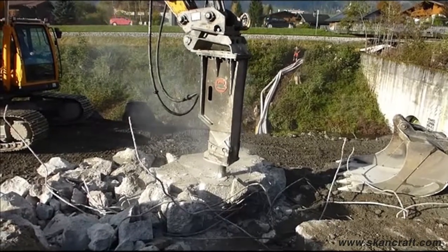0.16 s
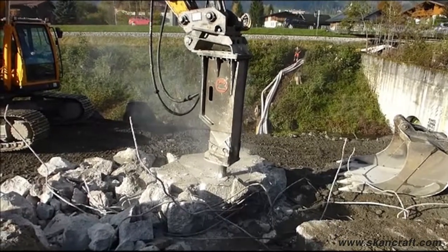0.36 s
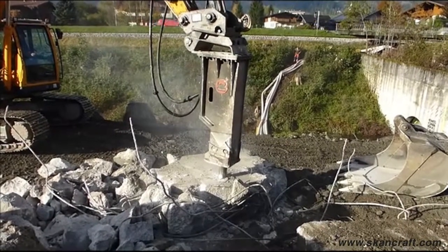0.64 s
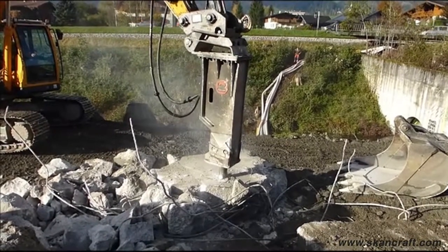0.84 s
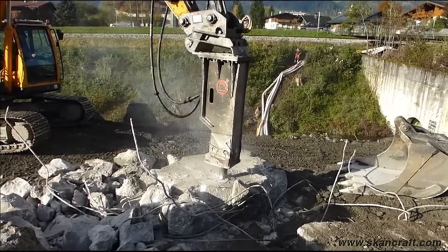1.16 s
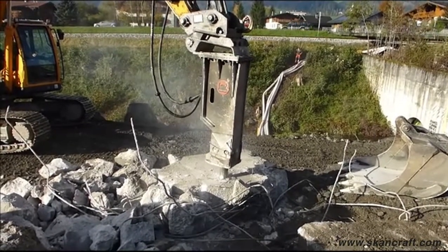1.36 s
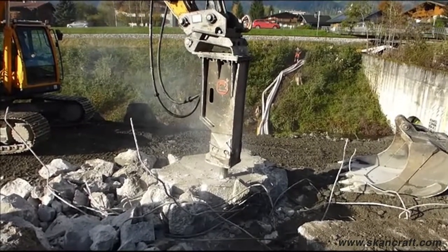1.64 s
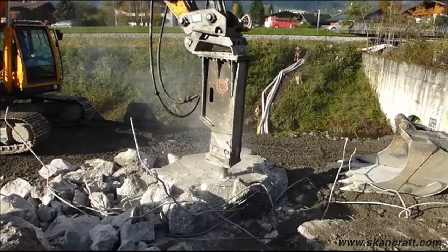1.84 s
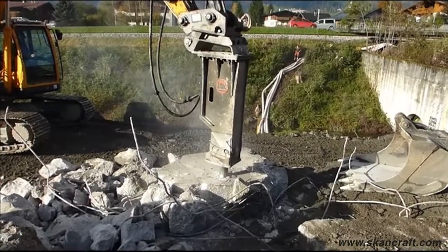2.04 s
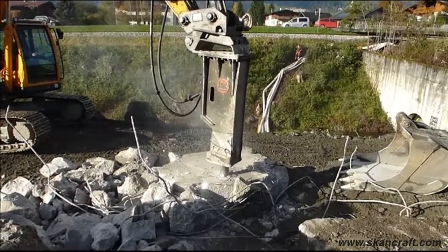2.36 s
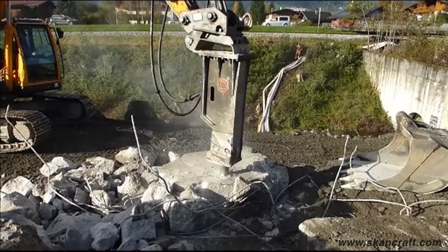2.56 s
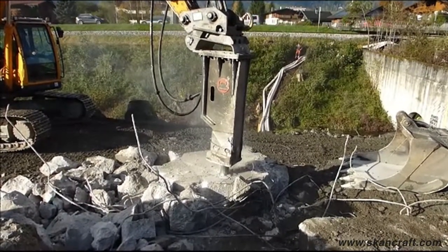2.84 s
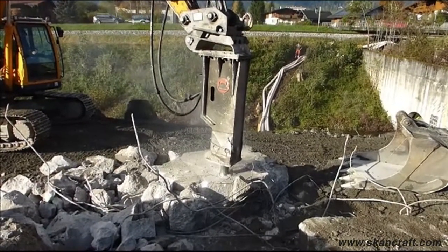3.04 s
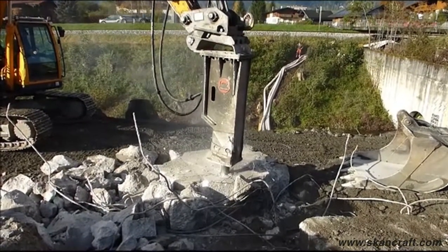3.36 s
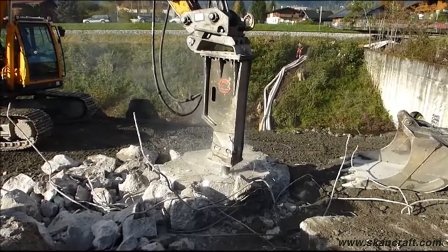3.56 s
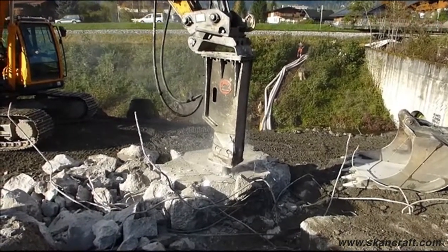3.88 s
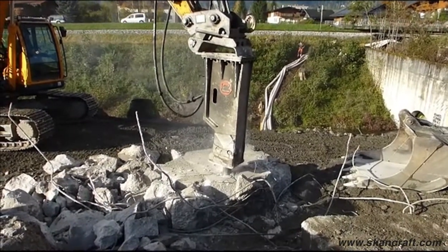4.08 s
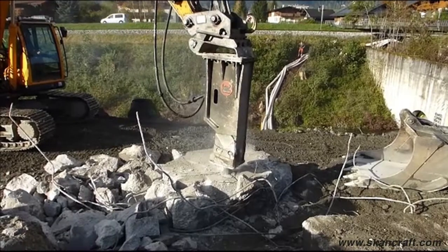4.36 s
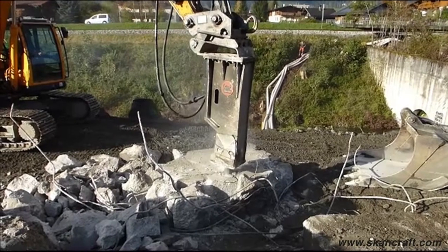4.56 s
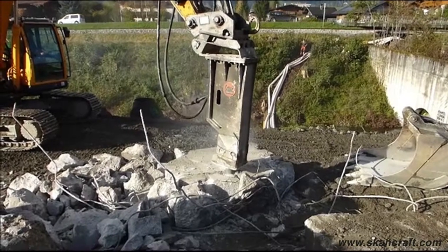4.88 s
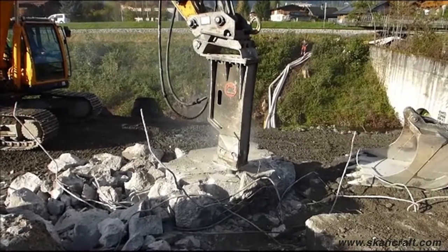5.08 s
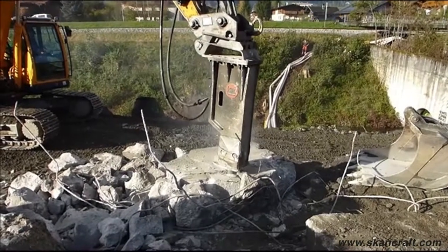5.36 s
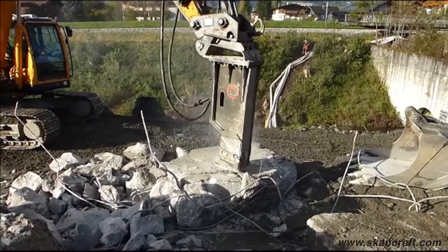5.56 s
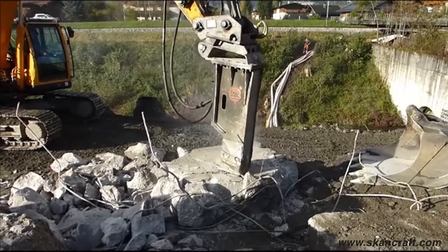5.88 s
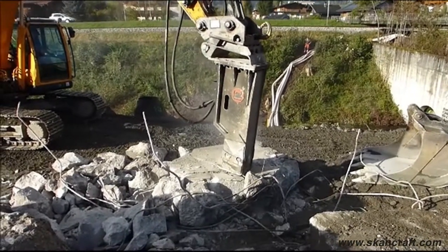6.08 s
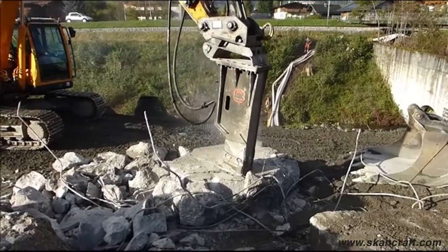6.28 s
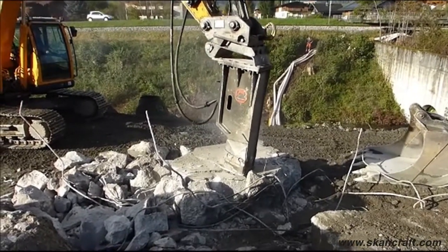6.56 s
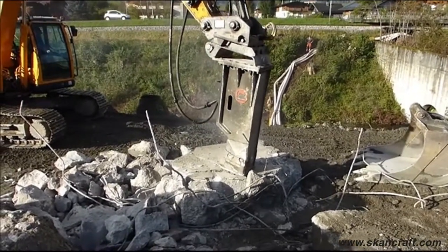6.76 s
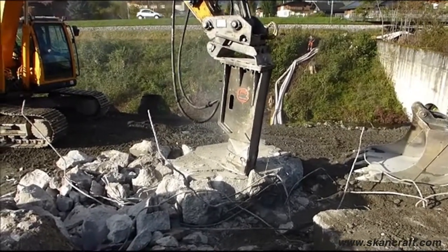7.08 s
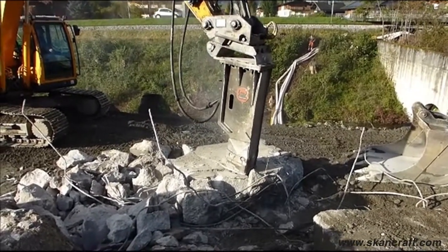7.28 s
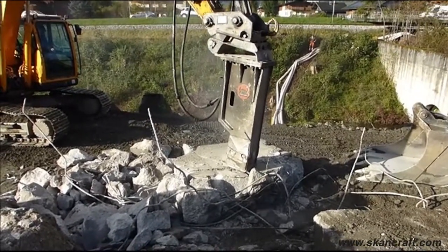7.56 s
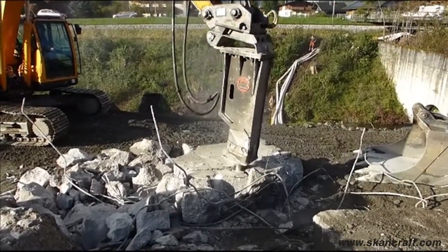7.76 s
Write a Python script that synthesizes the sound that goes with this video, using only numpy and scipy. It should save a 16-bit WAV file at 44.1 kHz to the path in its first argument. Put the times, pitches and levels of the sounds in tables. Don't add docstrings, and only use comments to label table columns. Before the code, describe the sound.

A hydraulic breaker is already pounding concrete at 0 s, in even blows around eight per second, over a low diesel rumble, fan noise and wavering pump tones. Just before each blow a valve spits a short whistling hiss; then steel cracks on stone, the slab thuds briefly and housing, chisel and loose panels ring and rattle, with a small recoil knock and site echo. From about 3 to 4.5 s the chisel bites deeper and the ringing grows fuller and changes colour. From 4.6 s the slab gives way: blows vary more and slow to about five or six per second, with chips clinking. The last full blow comes near 6.7 s; at 6.9 s an empty one merely shudders the housing. Afterwards the quieter engine runs on, a faint high belt whistle appears from 7.1 s, and stones tick and knock at 7.6-7.8 s. Mono, outdoors, slight hiss and softened peaks.

```python
import sys
import numpy as np
from scipy import signal
from scipy.io import wavfile
from scipy.ndimage import uniform_filter1d

SR = 44100
rng = np.random.default_rng(int(sys.argv[2]) if len(sys.argv) > 2 else 0)


def rack_gain(trim_db):
    fader = np.asarray(trim_db, float)
    return 10 ** (fader / 20)


def store_pcm(level_fs):
    pcm = np.round(np.clip(level_fs, -1, 1) * 32767).astype(np.int16)
    wavfile.write(sys.argv[1], SR, np.atleast_2d(pcm).T)


N = 349713
LENGTH = 11000


STAGES_S = [1.0, 2.9, 4.3, 6.1]


def by_stage(times, values):
    return np.interp(times, STAGES_S, values)


def at_hz(points, hz, axis=1):
    points = np.array(points)
    return np.interp(np.log(hz), np.log(points[:, 0]), points[:, axis])


def dying(t60, rise_s):
    t = np.arange(LENGTH) / SR
    swell = 1 - np.exp(-(t / rise_s) ** 2)
    close = np.cos(np.pi / 2 * (t / t[-1]) ** 4)
    return swell * rack_gain(-60 * t / t60) * close


def sine(hz, turn):
    return np.sin(2 * np.pi * hz * np.arange(LENGTH) / SR + turn)


def resonate(x, hz, width_hz):
    r = np.exp(-np.pi * width_hz / SR)
    feedback = [1, -2 * r * np.cos(2 * np.pi * hz / SR), r * r]
    return signal.lfilter([1, 0, -1], feedback, x) * np.sqrt((1 - r * r) / 2)


def bands(whites):
    edges = 16000 / 2 ** np.arange(9, -.1, -.5)
    for k, (low, high) in enumerate(zip(edges, edges[1:])):
        sos = signal.butter(2, [low, high], "band", fs=SR, output="sos")
        noise = signal.sosfilt(sos, whites[k % 2])
        yield np.sqrt(low * high), noise * np.sqrt(SR / 2 / (high - low))


# time_s, likeness (0-1)
LIKENESS = [(0, .95), (2, .93), (3, .8), (4.6, .8), (5.4, .4), (7, .35)]


def repeating(times, size):
    rows = rng.standard_normal((len(times), size))
    alike = np.interp(times, *np.transpose(LIKENESS))
    for k in range(1, len(times)):
        rows[k] = alike[k] * rows[k - 1] + np.sqrt(1 - alike[k] ** 2) * rows[k]
    return rows


def lay_out(rows, times):
    out = np.zeros(N + 2 * LENGTH)
    for row, s in zip(rows, times):
        at = LENGTH + round(s * SR)
        out[at:at + LENGTH] += row
    return out[LENGTH:LENGTH + N]


# pitch_hz, level_db (per Hz)
ENGINE = [(25, -2), (53, -10), (109, -2), (158, 0), (290, -9), (515, -4.5), (6900, -35), (15000, -53.5)]
# time_s, noise_db, brightness_db (per octave)
LOAD = [(0, -39.5, -0.5), (2, -38.5, -0.5), (4, -35.5, -0.5), (5.5, -39, 0), (6.9, -53.5, 2.5),
        (7.6, -49, 1.5), (7.75, -45, 0.2)]
# pitch_hz, level_db (rms), width_hz
TONES = [(88.4, -55.5, 6.3), (148, -59, 5), (177.8, -52.5, 8.6), (205, -70, 6), (247.9, -54, 0.92),
         (521.8, -52.5, 13.6), (680, -77.5, 80)]


def engine():
    t = np.arange(N) / SR
    load_s, *columns = np.transpose(LOAD)
    noise_db, tilt_db = [np.interp(t, load_s, column) for column in columns]

    noise = 0
    for hz, band in bands(rng.standard_normal((2, N))):
        flicker_db = np.interp(t, np.arange(200) / 18, rng.standard_normal(200))
        band_db = at_hz(ENGINE, hz) + flicker_db + tilt_db * np.log2(hz / 300)
        noise = noise + rack_gain(band_db) * np.sqrt(hz) * band
    noise *= (1 + .2 * np.sin(2 * np.pi * 43.05 * t)) / np.std(noise)

    white = rng.standard_normal(N)
    tones = sum(rack_gain(db) * resonate(white, hz, width_hz) for hz, db, width_hz in TONES)
    tone_db = -0.5 - 0.38 * (noise_db - noise_db.mean())

    belt_db = np.interp(t, [7.05, 7.2, 7.58, 7.73], [-95, -75, -75, -80])
    belt_db += 3.5 * np.interp(t, np.arange(200) / 20, rng.standard_normal(200))
    belt = rack_gain(belt_db) * resonate(white, 10650, 90)
    return rack_gain(noise_db) * noise + rack_gain(tone_db) * tones + belt


# time_s, clinks_per_s, level_db
CHIPS = [(0, 100, -82), (3.5, 200, -92), (5, 300, -62), (6.7, 300, -68), (7.05, 20, -68), (7.93, 10, -76)]


def chips():
    s, per_s, db = np.transpose(CHIPS)
    t = np.arange(N) / SR
    born = rng.random(N) < np.interp(t, s, per_s) / SR
    spread_db = 3.6 * rng.exponential(1, N).clip(0, 3)
    sizes = born * rack_gain(np.interp(t, s, db) + spread_db) + 1e-18
    pitches = np.geomspace(2600, 14500, 16)
    dealt = rng.integers(0, 16, N)
    return sum(6.2 * resonate(sizes * (dealt == k), hz, 130) for k, hz in enumerate(pitches))


# start_s, peak_db, pitch_hz
STONES = [
    (7.609, -51, 13500),
    (7.627, -57, 4200),
    (7.756, -45, 5000),
    (7.757, -59, 13000),
    (7.768, -55, 10500),
    (7.822, -52, 11000),
]


def stones():
    ticks = rng.standard_normal((len(STONES), LENGTH)) * dying(0.014, 0.00033)
    rows = [rack_gain(db) * resonate(tick, hz, .5 * hz) for tick, (s, db, hz) in zip(ticks, STONES)]
    return lay_out(rows, np.array(STONES)[:, 0])


# blow_number, time_s
PACE = [(-1, -.1111), (8, .9831), (16, 1.9612), (23, 2.8049), (31, 3.7719), (37, 4.5064)]
# time_s, thud_db, housing_db, steel_db
SEAT = [(0, -2, -0.5, 1), (.9, -.5, -3, 0.4), (1.8, 0.5, -0.5, 0), (2.5, -2, 0.5, 0.3), (2.95, -2, -1, -1),
        (3.5, -.3, 2.2, -3), (3.95, -2.8, -0.5, -2), (4.5, 1, -2, -3.5)]
# start_s, thud_db, housing_db, steel_db
SLOWING = [(4.632, 1.5, 0, -3), (4.7597, 4, 1.5, -2), (4.8903, 0, 0, -1.5), (5.0288, 0.5, 1.5, -1),
           (5.1768, 1, 1, -1.5), (5.337, 1, 1.5, -0.5), (5.4984, 1, -1.5, 0), (5.6774, 0, -2, 0.5),
           (5.8607, -3.5, -1, -1), (6.0395, -6.5, 1, -2), (6.2304, 0.5, -2, -1), (6.422, 1.5, -3.5, -1.5),
           (6.5901, 1.5, -0.5, -1), (6.7359, -1, -1.5, -1), (6.926, -11, -21, -27.5)]


def blow_table():
    number, mark_s = np.transpose(PACE)
    times = np.interp(np.arange(number[0], number[-1] + 1), number, mark_s)
    s, *parts = np.transpose(SEAT)
    steady = np.transpose([times] + [np.interp(times, s, part) for part in parts])
    return np.vstack([steady, SLOWING]).T


def part_db(blows, hz):
    times, thud_db, housing_db, steel_db = blows
    if hz < 300:
        return thud_db
    return housing_db if hz < 1800 else steel_db


def is_empty(blows):
    return (blows[3] < -12)[:, None]


LOOSE_STAGE_DB = [-3, -2.5, -2.5, -4.5]


def loose_db(times):
    return np.append(by_stage(times[:-1], LOOSE_STAGE_DB), -10)


# pitch_hz, level_db
SPIT = [(300, -62), (800, -31.5), (1600, -52.5), (3000, -38), (6000, -45.5), (8000, -36), (10500, -62.5),
        (15500, -62)]
# pitch_hz, width_hz, level_db
PORTS = [(1550, 65, -37.5), (2890, 32, -39), (9940, 1500, -35)]
VALVE_STAGE_DB = [-5, -3.5, -2.2, -5.5]
# time_s, lead_ms
LEAD = [(0, 29.1), (3, 29), (5.3, 28.5), (6.25, 27.5), (6.6, 29.8), (6.74, 33)]


def valve_spit(times, whites):
    spits = sum(rack_gain(db) * resonate(whites[1], hz, width_hz) for hz, width_hz, db in PORTS)
    for hz, noise in bands(whites):
        spits += rack_gain(at_hz(SPIT, hz)) * noise
    spits *= rack_gain(by_stage(times, VALVE_STAGE_DB))[:, None] * dying(.12, .002)
    lead_s = np.interp(times, *np.transpose(LEAD)) / 1000
    return lay_out(spits, times - lead_s)


# pitch_hz, t60_s, level_db at each of the four stages
RATTLE = [(70, 0.44, -40, -53, -55, -61), (170, 0.5, -46, -33, -26.5, -27.5),
          (294, 0.32, -51, -46, -31, -32.5), (520, 0.22, -22, -20.5, -19, -19.5),
          (1620, 0.15, -27.5, -27.5, -23.5, -21), (3250, 0.13, -20, -22.5, -21.5, -16),
          (6370, .22, -44, -42, -36.5, -40), (15000, .09, -50, -53, -46, -38)]


def rattle(blows, whites):
    times = blows[0]
    lumps = uniform_filter1d(repeating(times, size=LENGTH), size=200) * np.sqrt(200)
    chatter = rack_gain(0.75 * lumps)
    out = 0
    for hz, noise in bands(whites):
        t60 = at_hz(RATTLE, hz)
        stage_db = [at_hz(RATTLE, hz, axis=k) for k in range(2, 6)]
        shaken = np.where(is_empty(blows), dying(t60, 0.035), dying(t60, 0.0091)) * chatter
        out = out + rack_gain(by_stage(times, stage_db) + loose_db(times))[:, None] * shaken * noise
    return out


# pitch_hz, split_hz, t60_s, level_db at each of the four stages
PANELS = [(165, 16.3, 0.16, -25, -26, -20, -23.5), (257.6, 11, 0.39, -29, -25.5, -25, -36.5),
          (323.9, 13.5, 0.54, -42.5, -24.5, -29.5, -39), (416.4, 12, 0.19, -31, -41, -37.5, -25.5),
          (514.5, 36.4, 0.2, -48, -37, -33, -21.5), (681, 12, 0.36, -38, -21, -19, -28),
          (866, 23, 0.28, -65, -23, -30, -33), (1075, 53.6, 0.47, -33.5, -25.5, -33, -30),
          (960, 30, 0.34, -55, -43, -37.5, -33), (494.4, 9.5, 0.38, -34, -24, -34, -40),
          (1970, 22, 0.17, -48, -44, -20, -41), (1578, 47, 0.1, -36, -18, -36.5, -46),
          (2660, 22.4, .4, -55, -42, -35, -34.5), (3110, 30.5, 0.16, -50, -38, -22, -28)]
STILL_S = [0.1, 0.05, 0.084, 0.17]


def panels(blows, sway):
    times = blows[0]
    t = np.arange(LENGTH) / SR
    turns = repeating(times, size=2 * len(PANELS)).T[:, :, None]
    scatter_db = 3 * repeating(times, size=len(PANELS)).T
    free = np.exp(-(t / by_stage(times, STILL_S)[:, None]) ** 4)
    buzzing, steadier = rack_gain(4.5 * sway - 1), rack_gain(1.6 * sway)
    out = 0
    for k, (hz, split_hz, t60, *stage_db) in enumerate(PANELS):
        pair = sine(hz, 1.51 * turns[2 * k]) + 0.62 * sine(hz + split_hz, 2.0 * turns[2 * k + 1])
        if hz > 1800:
            shaken_db, uneven, t60 = part_db(blows, hz) - 2.5, buzzing, min(t60, .36)
        else:
            shaken_db, uneven = loose_db(times), steadier
        if hz > 350:
            pair = pair * free
        gain = rack_gain(by_stage(times, stage_db) + shaken_db + scatter_db[k])[:, None]
        out = out + gain * pair * np.roll(uneven, 900 * k, axis=1) * dying(t60, 0.018)
    return out


# level_db, t60_s
ROD = [(-50, .19), (-52, .19), (-52, .17), (-55, .18), (-60, .15), (-60, .14)]
ROD_STAGE_DB = [1, 3, 9, 8]


def rod(blows, sway):
    times, rod_hz = blows[0], 1692
    turns = repeating(times, size=len(ROD)).T[:, :, None]
    wobble = rack_gain(4.5 * sway - 1)
    out = 0
    for k, (db, t60) in enumerate(ROD):
        gain = rack_gain(db + by_stage(times, ROD_STAGE_DB) + part_db(blows, rod_hz))[:, None]
        tone = sine((k + 4) * rod_hz, turns[k]) * dying(t60, .003)
        out = out + gain * np.roll(wobble, 900 * k, axis=1) * tone
    return out


# pitch_hz, level_db, t60_s
SHUDDER = [(131, -32.5, 0.41), (210, -32, 0.67), (267, -28.5, 0.59), (514, -43, 0.33), (720, -29, 0.25),
           (1060, -21.5, 0.16)]


def shudder():
    return sum(rack_gain(db) * sine(hz, 0) * dying(t60, 0.029) for hz, db, t60 in SHUDDER)


# pitch_hz, t60_s, level_db at each of the four stages
HOUSING = [(326, 0.093, -25, -35, -28.5, -24), (421.2, 0.13, -17, -18, -14, -18.5),
           (524.6, 0.084, -15.5, -16.5, -26, -12), (580, 0.047, -9.5, -10.5, -11, -8),
           (663, 0.019, -5, -43.5, -10, -13), (766.5, 0.12, -19.5, -23.5, -14.5, -28),
           (837, 0.033, -16, -4, -8.5, -8), (965, 0.1, -47, -27, -24.5, -16.5),
           (1064, 0.045, -33, -28, -38, -7.5), (1137, 0.12, -25, -24.5, -26.5, -10),
           (1300, 0.16, -41, -22.5, -17, -21.5), (1469, 0.095, -22, -24, -20, -22.5),
           (1576, 0.19, -23, -26, -20.5, -31)]
# pitch_hz, t60_s, level_db at each of the four stages
CHISEL = [(1974, 0.24, -43, -22, -36, -28), (2567, 0.081, -21.5, -21, -65, -14.5),
          (2658, 0.044, -20.5, -29, -22, -6), (2963, 0.014, -0.5, 0, -15, -1),
          (3097, 0.048, -57, -20, -12, -10), (3499, 0.039, -12, -7.5, -3.5, -11),
          (3860, 0.03, -19, -9.5, -17.5, -12), (4266, 0.069, -74, -26.5, -20.5, -24),
          (4733, 0.036, -53, -15.5, -12, -24), (5050, 0.048, -23.5, -22.5, -18, -18.5)]


def housing_and_chisel(blows):
    times, modes = blows[0], HOUSING + CHISEL
    turns = repeating(times, size=len(modes)).T[:, :, None]
    out = 0
    for turn, (hz, t60, *stage_db) in zip(turns, modes):
        gain = rack_gain(by_stage(times, stage_db) + part_db(blows, hz) - 2)[:, None]
        out = out + gain * sine(hz, 1.22 * turn) * dying(min(t60, .09), 0.0024)
    return out


# pitch_hz, t60_s, level_db at each of the four stages
SLAB = [(149.5, 0.11, -13, -13.5, -12, -11), (207.9, 0.099, -4.5, -3.5, -8, -11)]


def slab_thud(blows):
    t, lag_s = np.arange(LENGTH) / SR, .0015
    out = 0
    for hz, t60, *stage_db in SLAB:
        gain = rack_gain(by_stage(blows[0], stage_db) + part_db(blows, hz) - 2)[:, None]
        thud = sine(hz, -2 * np.pi * hz * lag_s) * dying(t60, 0.0039)
        out = out + gain * thud * np.exp(-(t / 0.016) ** 2)
    return out


SNAP_STAGE_DB = [-35, -28, -20, -17.5]


def tip_slap(blows):
    lag_s, width_s = 0.00291, 0.00046
    x = (np.arange(LENGTH) / SR - lag_s) / width_s
    gain = rack_gain(by_stage(blows[0], SNAP_STAGE_DB) + blows[3])[:, None]
    return ~is_empty(blows) * gain * (x ** 2 - 1) * np.exp(-x ** 2 / 2)


# pitch_hz, level_db
CRACK = [(60, -46), (200, -48), (600, -28), (1500, -29), (3000, -23), (5000, -26), (9500, -32),
         (15500, -41)]


def crack_and_recoil(blows, whites):
    crack = np.where(is_empty(blows), rack_gain(16.5) * dying(0.12, 0.0073), dying(0.049, 0.0015))
    recoil = rack_gain(-20.5) * np.roll(dying(0.063, 0.0016), round(0.0397 * SR))
    out = 0
    for hz, noise in bands(whites):
        out = out + rack_gain(at_hz(CRACK, hz) + part_db(blows, hz))[:, None] * (crack + recoil) * noise
    return out


def breaker():
    blows = blow_table()
    times = blows[0]
    whites = [repeating(times, size=LENGTH), repeating(times, size=LENGTH)]
    sway = uniform_filter1d(repeating(times, size=LENGTH), size=500) * np.sqrt(500)
    rows = crack_and_recoil(blows, whites) + tip_slap(blows) + slab_thud(blows)
    rows += housing_and_chisel(blows) + rod(blows, sway) + panels(blows, sway)
    rows += rattle(blows, whites)
    rows[-1] += shudder()
    return lay_out(rows, times) + valve_spit(times, whites)


def scene():
    return (engine() + chips() + stones() + breaker())[None]


def low_pass(x):
    return signal.sosfilt(signal.butter(12, 16480, fs=SR, output="sos"), x)


def record(dry):
    colour = signal.butter(2, [50, 14500], "band", fs=SR, output="sos")
    bright = signal.butter(2, 9000, "high", fs=SR)
    hiss = rack_gain(-69) * signal.lfilter(*bright, rng.standard_normal(dry.shape))
    heard = signal.sosfilt(colour, dry) + hiss
    soft = 1.365 * np.tanh(heard / 1.649)
    cut = signal.cheby2(12, 70, 16500, fs=SR, output="sos")
    return low_pass(signal.sosfilt(cut, soft))


dry = scene()
out = record(dry)
store_pcm(out)
```